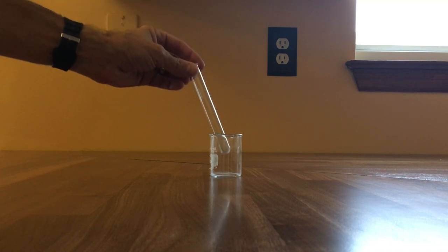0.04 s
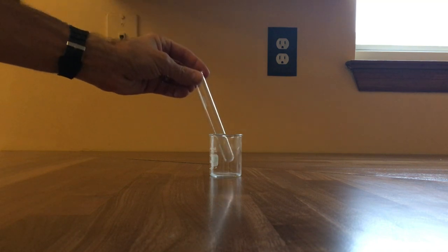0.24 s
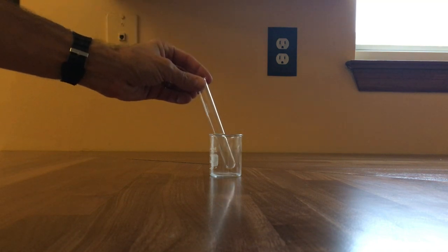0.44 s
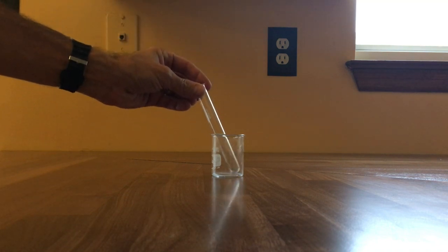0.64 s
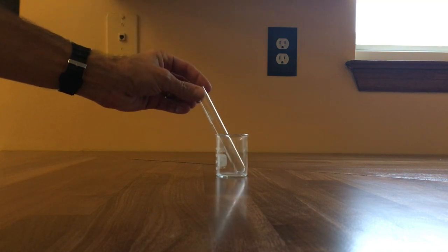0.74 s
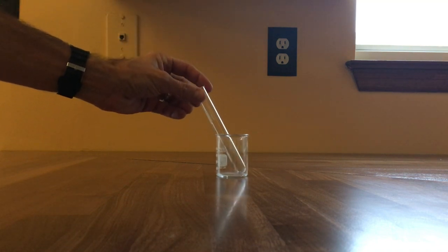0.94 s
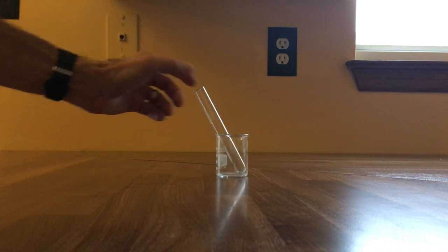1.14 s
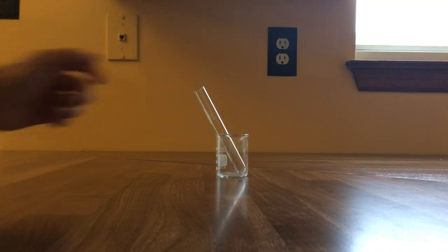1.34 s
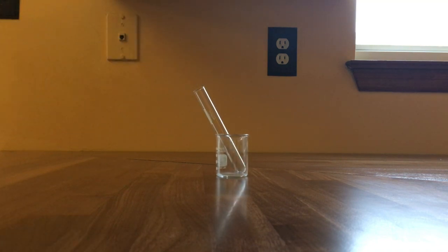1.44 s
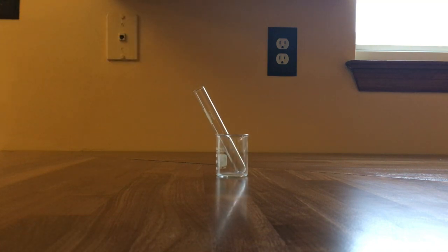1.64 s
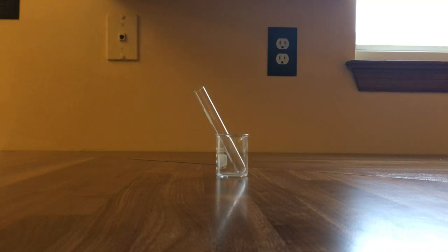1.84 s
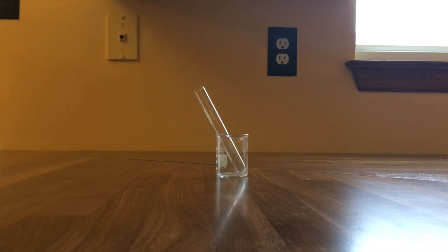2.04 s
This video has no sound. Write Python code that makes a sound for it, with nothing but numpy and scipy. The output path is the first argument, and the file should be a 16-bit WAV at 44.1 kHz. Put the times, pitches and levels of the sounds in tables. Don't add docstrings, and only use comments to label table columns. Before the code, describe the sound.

Bright glass clinks as a test tube drops into a beaker and settles on a wooden table

```python
import sys
import numpy as np
from scipy import signal
from scipy.fft import rfft, irfft
from scipy.io import wavfile
from scipy.ndimage import uniform_filter1d

SR = 44100
rng = np.random.default_rng(int(sys.argv[2]) if len(sys.argv) > 2 else 0)


def int16_out(signal):
    q = np.round(np.clip(np.atleast_2d(signal).T, -1, 1) * 32767)
    wavfile.write(sys.argv[1], SR, q.astype(np.int16))


def magnitude_from_level(level_db):
    exponent = np.asarray(level_db, float) / 20
    return 10 ** exponent


N = 92610

# hz, level_db_per_hz
AIR_COLOUR = [(22, -43), (40, -18.5), (62, -7), (160, -4), (500, -16.5), (1300, -27.5), (4500, -43),
              (15500, -50.5)]
# hz, level_db, width_hz
FAN_LINES = [(65.4, -65.5, 6.7), (150, -70, 25), (229.5, -69.5, 24), (620, -74, 17), (1062, -74.5, 9)]
# hz, level_db_per_hz
CLOTH_COLOUR = [(600, -13), (1500, -1.5), (3000, -4.5), (6000, -6.5), (10000, -13.5), (16000, -28)]
# time_s, level_db
SLEEVE_LEVEL = [
    (1.35, -86),
    (1.6, -75),
    (1.79, -72),
    (1.8, -61),
    (1.85, -62),
    (1.9, -70.5),
    (1.97, -74),
    (2.1, -77),
]
# hz, t60_s
ROOM_DECAY = [(250, 0.17), (700, 0.39), (1500, 0.3), (3500, 0.51), (5500, 0.37), (8000, .28), (12000, 0.3)]
# start_s, table_db, tube_db, crack_db, table_centre_hz
BLOWS = [(.0850, -55, -79.5, -94, 980), (.2007, -44.5, -46, -33.5, 1110), (.4932, -34, -32.5, -36.5, 1300),
         (.5055, -38.5, -32.5, -26, 1200), (.5125, -34.5, -41.5, -50, 1110), (.5210, -36.5, -63, -60, 800),
         (.5680, -51.5, -73, -74, 1330), (.6545, -46, -51, -62, 1286), (.6744, -23, -33.5, -32.5, 1490),
         (.6792, -27, -42, -68, 1300), (.6855, -31.5, -35.5, -45, 900), (.6944, -31.5, -25.5, -23, 1000),
         (.7085, -38.5, -47.5, -61, 920), (.7890, -40.5, -64, -46, 2000), (.7950, -56, -64, -65, 1400),
         (.8361, -39.5, -75.5, -81.5, 695), (.8480, -42.5, -75, -78, 670), (1.0242, -47.5, -83, -78, 560),
         (1.0355, -47.5, -95, -74, 675), (1.0470, -47, -93, -75, 620), (1.0590, -48.5, -83, -83, 600)]
# pitch_hz, t60_s
TABLE_MODES = [(240, .04), (310, .04), (400, .04), (510, .035), (660, .045), (715, .04), (920, .03),
               (1110, .03), (1250, .022), (1340, .03), (1510, .025), (1720, .025), (2010, .04), (2170, .02)]
TABLE_MODE_DB = [-3.5, 0, -7, -6.5, -3, -1.5, -11, -5, 2, 4, -4.5, -5, -10.5, -4]
# pitch_hz, level_db
TUBE_MODES = [(3570, -17), (4250, -17), (4750, -9), (5100, -4), (5280, 0), (5440, 0), (5650, -4),
              (5950, -7), (6200, -9), (6900, -18), (8700, -18), (9800, -5), (10300, -13), (10750, -14)]
# time_s, level_db
TUBE_FREE_END = [
    (.66, -51),
    (.672, 7.5),
    (.69, -11.5),
    (1, -6),
]
# hz, level_db
CRACK_COLOUR = [(0, -15), (1800, -13.5), (3500, -0.5), (5500, -18.5), (8000, 1.5), (10500, -23),
                (13000, -17), (16000, -29.5), (22050, -51)]
# level_db, pitch_hz, t60_s
GLASS_TICK = (-51, 3800, .016)
CLINK_START = [-.0478, .0857, .2008, .4930, .5064, .6750, .6944, .7150, .7990, .8450, .8750]
# level_db, lowest_twins_place_rad, higher_twins_place_rad, tilt_db_per_octave
RIM_CLINKS = [(-54, -0.78, .2, -10), (-64.5, -1.16, 0.17, -1.5), (-36.5, -0.87, 0.16, 0),
              (-33, -0.0026, 0.37, 5), (-33.5, 0.79, 0.54, 1), (-37.5, -0.043, 0.35, -11),
              (-39.5, -0.36, 1.7, 7.5), (-39, 0.24, 0.72, -8), (-60.5, 0.16, 1.5, 1), (-68, 1.5, .8, -6),
              (-63.5, .3, 1.4, -6)]
# low_hz, high_hz, low_t60_s, high_t60_s (the third and fifth rows give
BEAKER_TWINS = [(2921.3, 2981, .75, .92), (7817, 7958, .19, .14), (12710, 12590, .13, .14),
                (13600, 13780, .12, .11), (15700, 14370, .08, .09)]
BEAKER_TWIN_DB = [0.5, 0.5, -15.5, -22.5, -17.5]
# time_s, change_db
TOUCHES = [(.2007, -20), (.4930, -20), (.5055, -18), (.6750, -10), (.6944, -18), (.7150, -12), (.7880, -26),
           (.8250, -8), (.9330, -10)]


def evened(x):
    return x / np.sqrt(np.mean(x ** 2) + 1e-20)


def read(points, hz):
    f, value = np.transpose(points)
    return np.interp(np.log(hz + 1), np.log(f + 1), value)


def add(mix, start_s, sound):
    part = mix[round(start_s * SR):][:len(sound)]
    part += sound[:len(part)]


def noise(colour, patchy_db):
    frames = N // 128 + 9
    hz = np.fft.rfftfreq(2048, 1 / SR)
    real, imag, patches = rng.standard_normal((frames // 4, 1025, 3)).T
    patches = uniform_filter1d(patches, size=14, axis=0)
    patches = evened(uniform_filter1d(patches, size=4, axis=1))
    spectrum = (real + 1j * imag) * magnitude_from_level(read(colour, hz)[:, None] + patchy_db * patches)
    return evened(signal.istft(spectrum, nperseg=2048, noverlap=1536)[1][:N])


def fan():
    air_db = -56.5
    out = magnitude_from_level(air_db) * noise(AIR_COLOUR, patchy_db=0.5)
    hz = np.fft.rfftfreq(N, 1 / SR)
    for line_hz, level_db, width_hz in FAN_LINES:
        shape = np.exp(-((hz - line_hz) / width_hz) ** 2)
        hum = irfft(rfft(rng.standard_normal(N)) * shape, N)
        out = out + magnitude_from_level(level_db) * evened(hum)
    return out


def sleeve():
    level_db = np.interp(np.arange(N) / SR, *np.transpose(SLEEVE_LEVEL))
    return magnitude_from_level(level_db) * noise(CLOTH_COLOUR, patchy_db=3.0)


def room(x):
    gap_s, spacing = .004, 20
    taps = np.zeros(SR // 2)
    count = (len(taps) - 1) // spacing
    at = np.arange(0, len(taps) - spacing, spacing) + rng.integers(0, spacing, count)
    taps[at] = rng.choice([-1., 1.], at.shape)
    hz, t, bands = signal.stft(taps, SR, nperseg=256)
    decay = magnitude_from_level(-60 * t / read(ROOM_DECAY, hz)[:, None])
    tail = signal.istft(bands * decay, SR, nperseg=256)[1]
    tail = np.r_[np.zeros(round(gap_s * SR)), tail]
    return signal.fftconvolve(x, tail / np.linalg.norm(tail))[:N]


def rings(hz, level_db, t60_s, luck):
    detune, scatter_db = .02, 2.5
    t = np.arange(4000)[:, None] / SR
    pitch_luck, level_luck = luck[:, :, None, :len(hz)]
    sign = (-1.) ** np.arange(len(hz))
    size = sign * magnitude_from_level(level_db - 3 + scatter_db * level_luck - 60 * t / t60_s)
    pairs = size * np.sin(2 * np.pi * hz * (1 + detune * pitch_luck) * t)
    return pairs.sum((0, 2))


def table(luck):
    rise_s, octaves, wider_per_db = .00024, .33, .042
    out = np.zeros(N)
    rise = 1 - np.exp(-np.arange(4000) / SR / rise_s)
    hz, t60_s = np.transpose(TABLE_MODES)
    for k, (start_s, table_db, _, _, centre_hz) in enumerate(BLOWS):
        span = octaves + wider_per_db * max(table_db + 50, 0)
        near_db = -6 * (np.log2(hz / centre_hz) / span) ** 2
        add(out, start_s, magnitude_from_level(table_db) * rise * rings(hz, TABLE_MODE_DB + near_db, t60_s, luck[k]))
    return out


def tube(luck):
    held_t60_s, free_t60_s = .026, .045
    out = np.zeros(N)
    hz, mode_db = np.transpose(TUBE_MODES)
    free = hz > 9000
    t60_s = np.where(free, free_t60_s, held_t60_s)
    for k, (start_s, _, tube_db, _, _) in enumerate(BLOWS):
        end_db = free * np.interp(start_s, *np.transpose(TUBE_FREE_END))
        add(out, start_s, magnitude_from_level(tube_db) * rings(hz, mode_db + end_db, t60_s, luck[k]))
    return out


def cracks():
    crack_t60_s, tick_s = .0075, .8575
    out = np.zeros(N)
    t = np.arange(600) / SR
    hiss = rng.standard_normal((40, 600))
    gain = magnitude_from_level(2 * read(CRACK_COLOUR, np.linspace(0, SR / 2, 65)))
    colour = signal.minimum_phase(signal.firwin2(127, np.linspace(0, 1, 65), gain))
    colour = colour / np.linalg.norm(colour)
    for k, (start_s, _, _, crack_db, _) in enumerate(BLOWS):
        burst = magnitude_from_level(crack_db - 60 * t / crack_t60_s) * hiss[k]
        add(out, start_s, np.convolve(burst, colour))
    level_db, hz, t60_s = GLASS_TICK
    add(out, tick_s, rings(np.array([hz]), level_db, t60_s, np.zeros((2, 2, 1))))
    return out


def beaker():
    rise_cycles, choke_s = 2.1, .013
    out = np.zeros(N)
    now = np.arange(round(1.3 * SR)) / SR
    lowest_hz = BEAKER_TWINS[0][0]
    for start_s, (level_db, low_place, high_place, tilt_db) in zip(CLINK_START, RIM_CLINKS):
        t = np.maximum(now - start_s, 0)
        held_db = level_db
        for touch_s, change_db in TOUCHES:
            if touch_s > start_s + .004:
                held_db = held_db + change_db * np.clip((now - touch_s) / choke_s, 0, 1)
        for k, (low_hz, high_hz, low_t60, high_t60) in enumerate(BEAKER_TWINS):
            place = high_place if k else low_place
            low = np.cos(place) * magnitude_from_level(-60 * t / low_t60) * np.sin(2 * np.pi * low_hz * t)
            high = np.sin(place) * magnitude_from_level(-60 * t / high_t60) * np.sin(2 * np.pi * high_hz * t)
            rise = 1 - np.exp(-t * low_hz / rise_cycles)
            mode_db = held_db + BEAKER_TWIN_DB[k] + tilt_db * np.log2(low_hz / lowest_hz)
            add(out, 0, magnitude_from_level(mode_db) * rise * (low + high))
    return out


def scene():
    luck = rng.standard_normal((40, 2, 2, 2, 14))
    close = np.vstack([beaker(), table(luck[:, 0]), tube(luck[:, 1]), cracks()])
    room_send_db = np.array([-16.5, -7, -7, -10])
    wet = room(magnitude_from_level(room_send_db) @ close)
    return (close.sum(0) + wet + fan() + sleeve())[None]


def top_cut(x):
    return signal.sosfilt(signal.butter(12, 16500, fs=SR, output="sos"), x)


def record(dry):
    edge_hz = 15630
    mix = signal.oaconvolve(dry, signal.firwin(127, edge_hz, fs=SR)[None], "same")
    return top_cut(mix)


dry = scene()
out = record(dry)
int16_out(out)
```